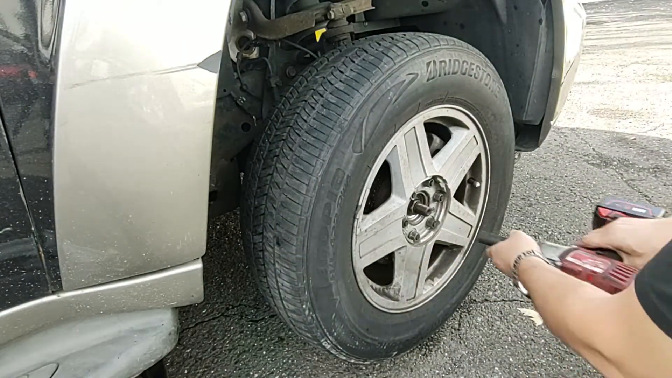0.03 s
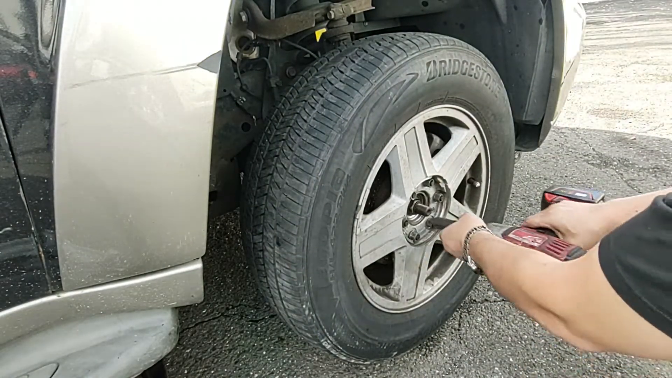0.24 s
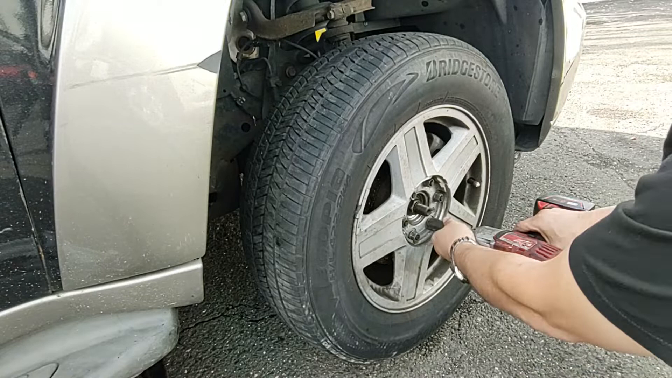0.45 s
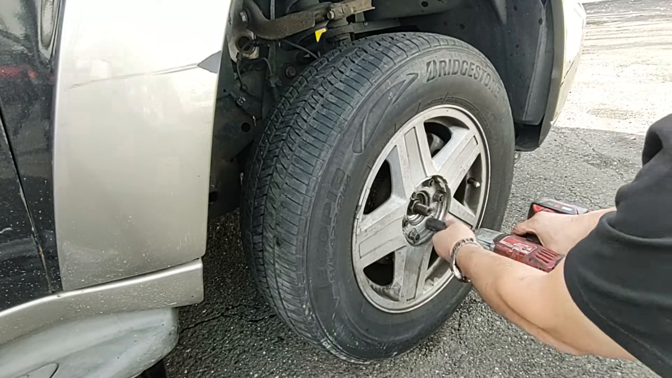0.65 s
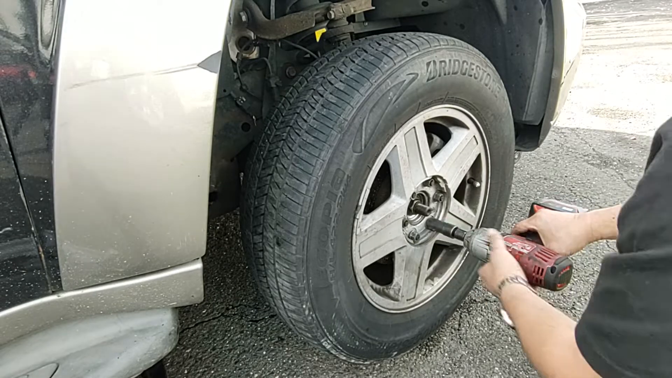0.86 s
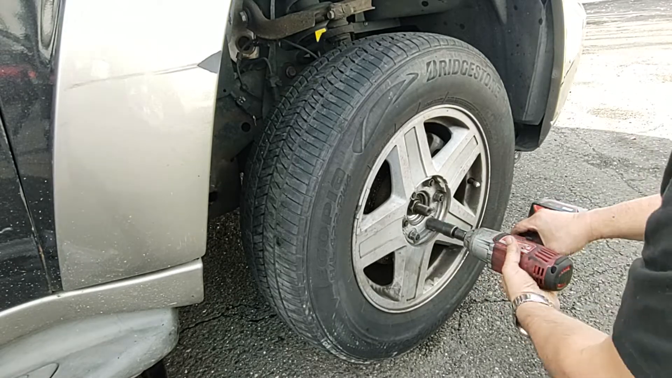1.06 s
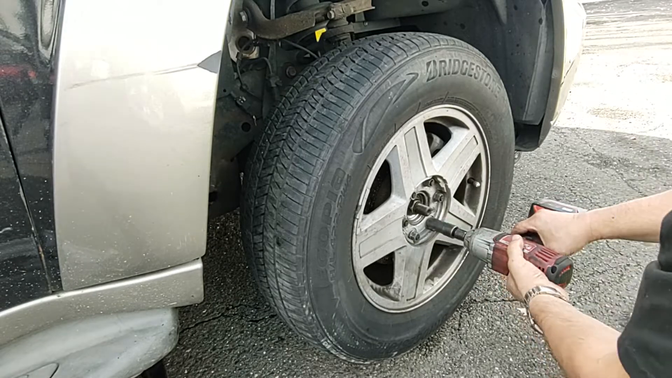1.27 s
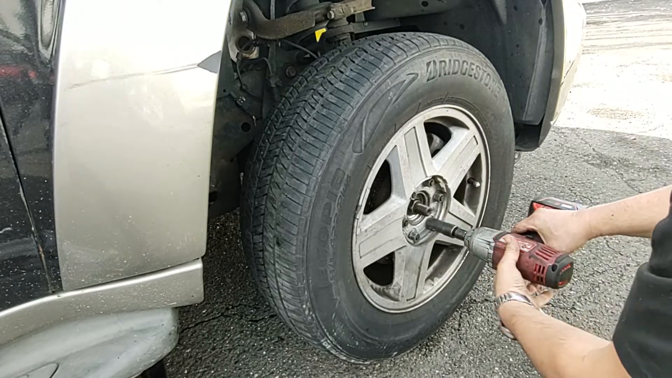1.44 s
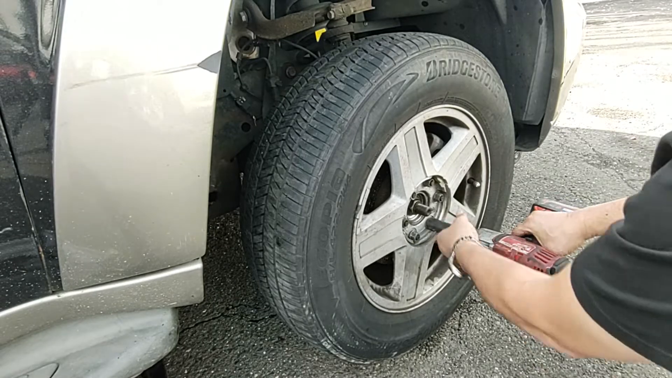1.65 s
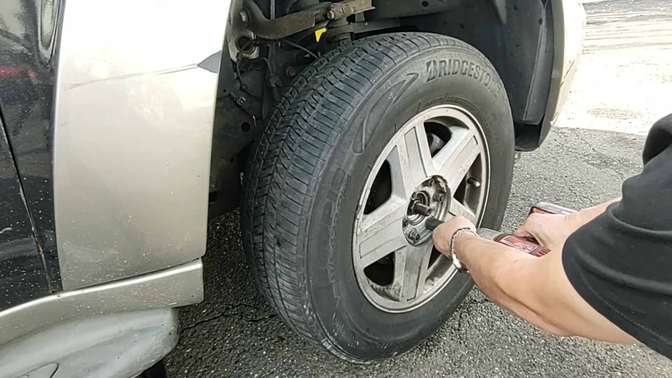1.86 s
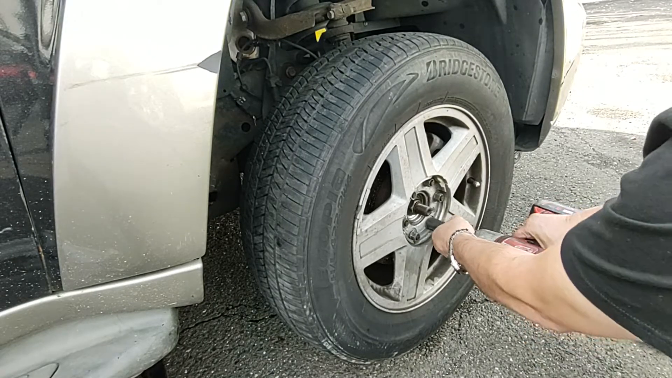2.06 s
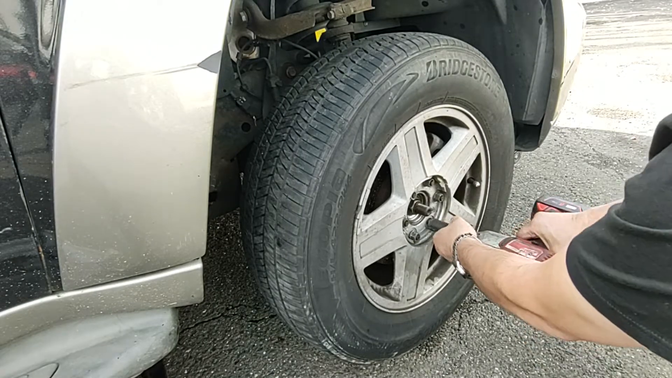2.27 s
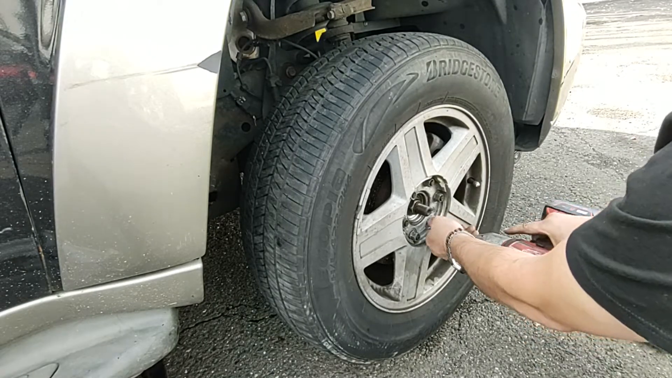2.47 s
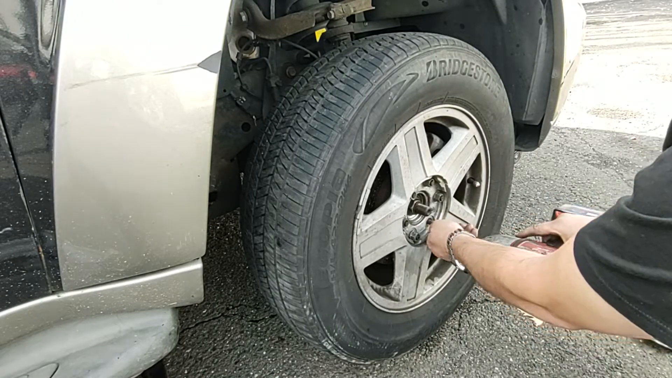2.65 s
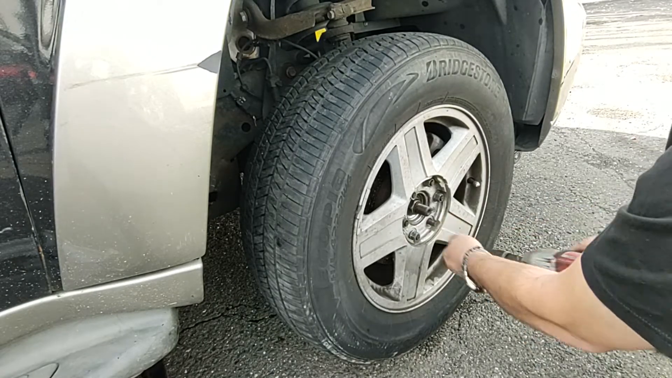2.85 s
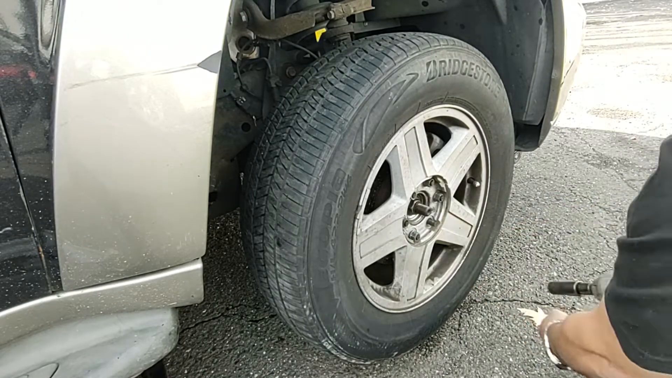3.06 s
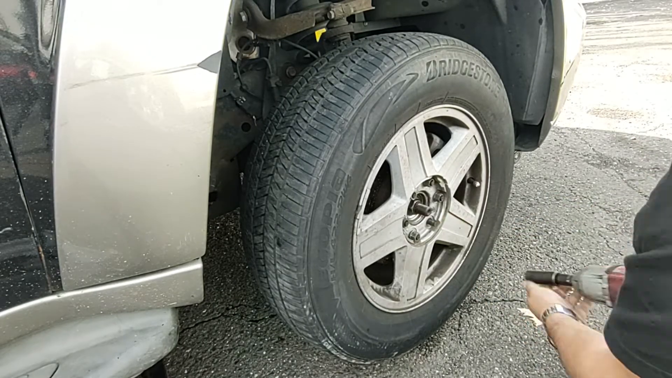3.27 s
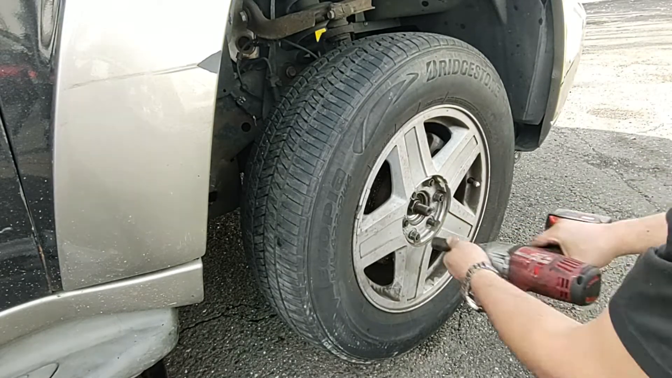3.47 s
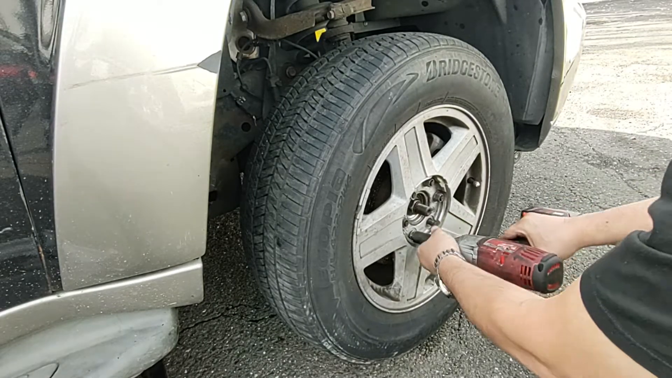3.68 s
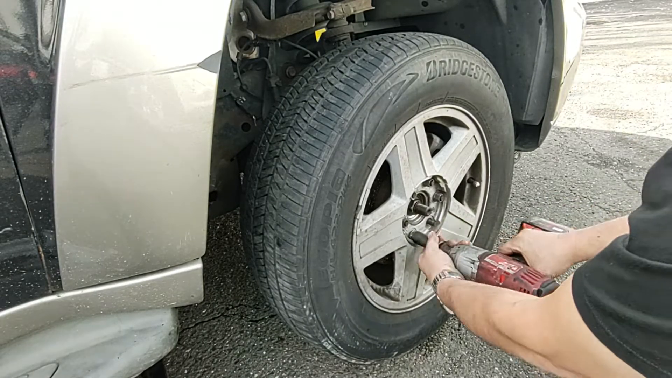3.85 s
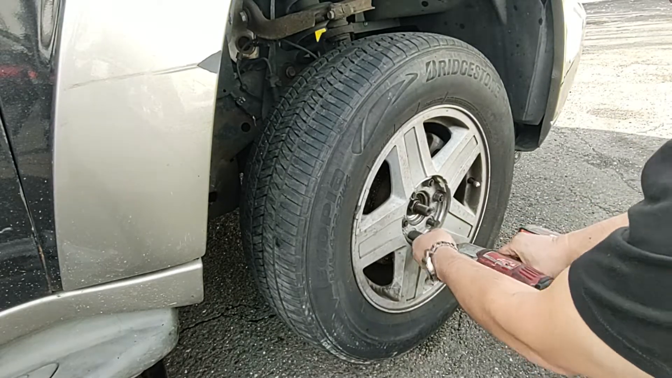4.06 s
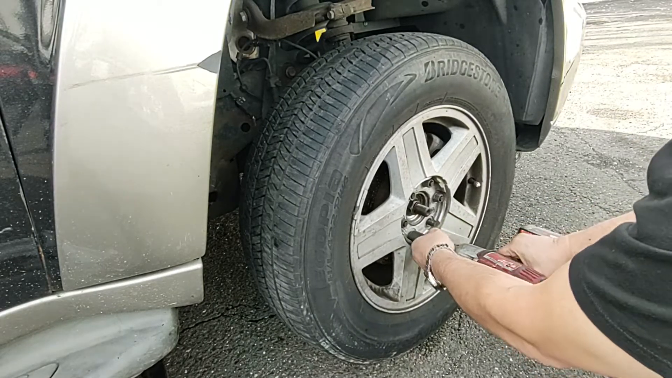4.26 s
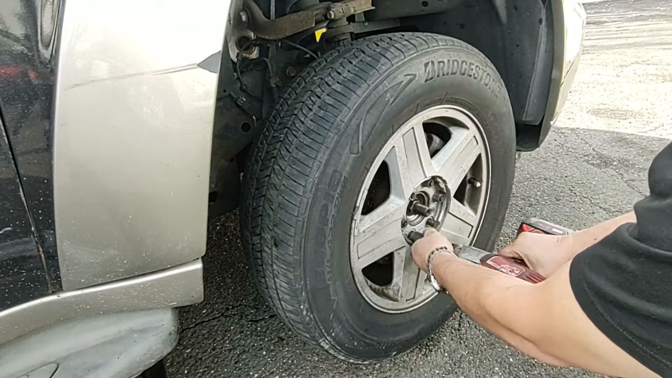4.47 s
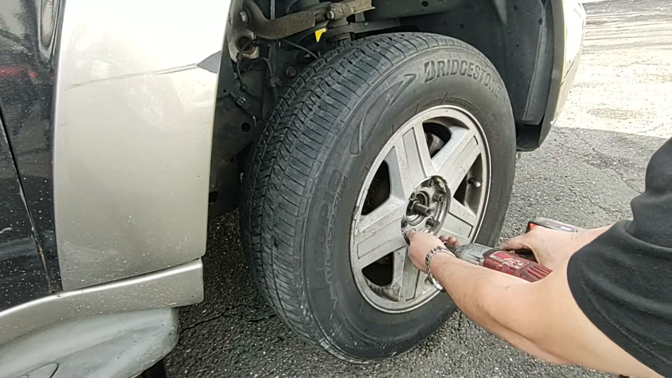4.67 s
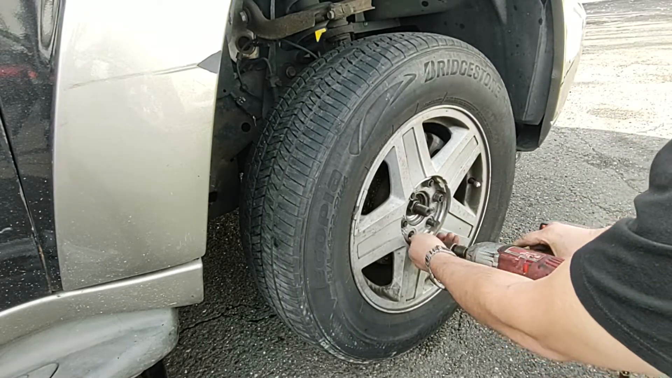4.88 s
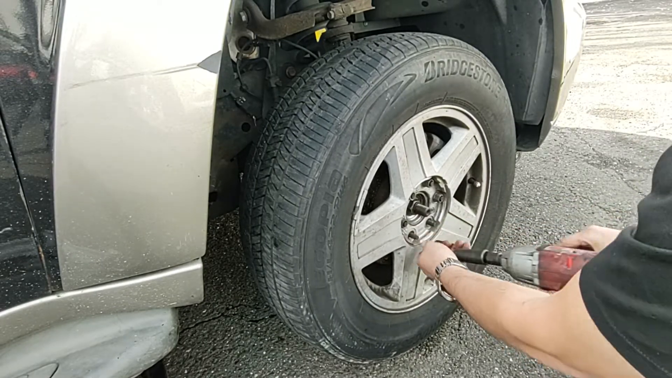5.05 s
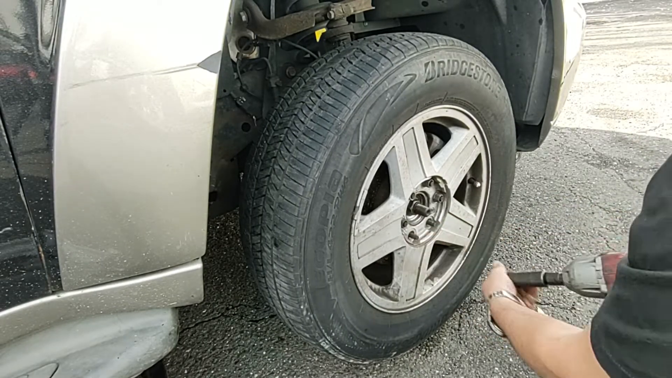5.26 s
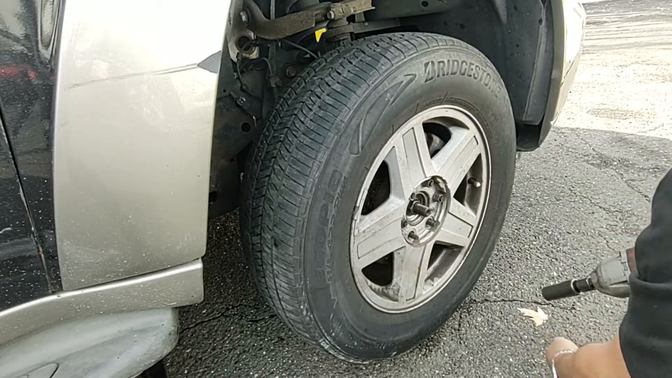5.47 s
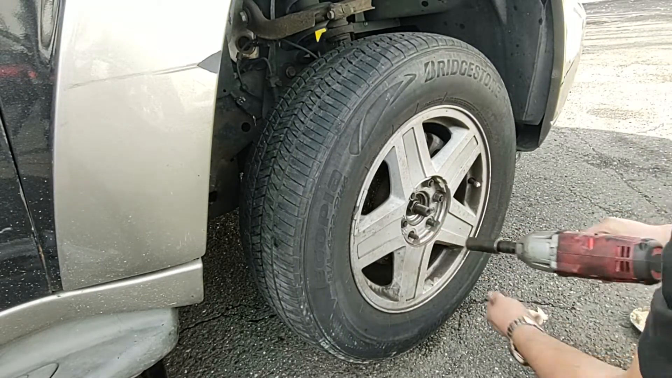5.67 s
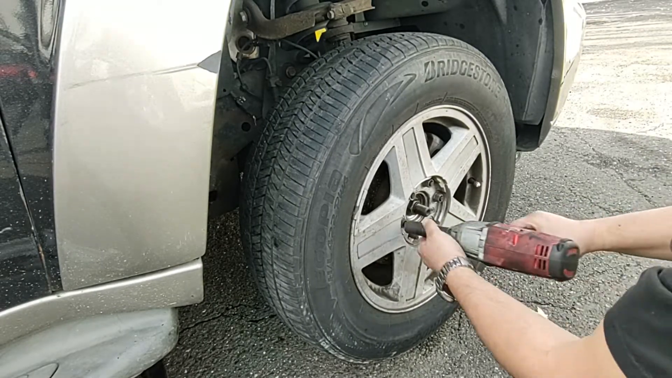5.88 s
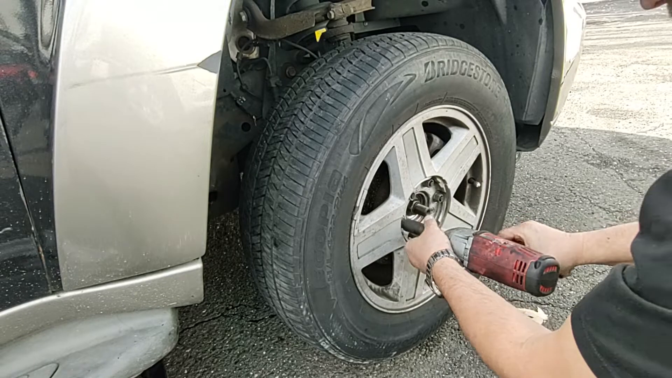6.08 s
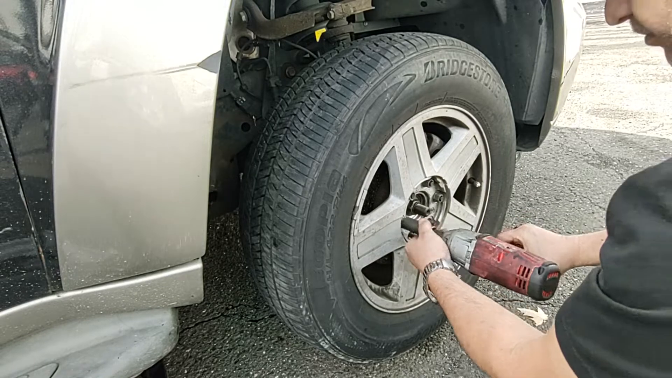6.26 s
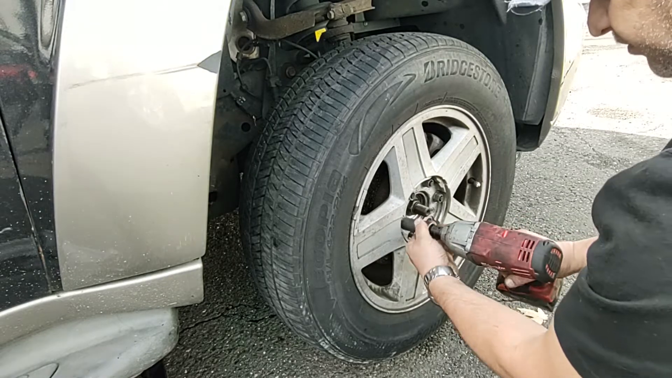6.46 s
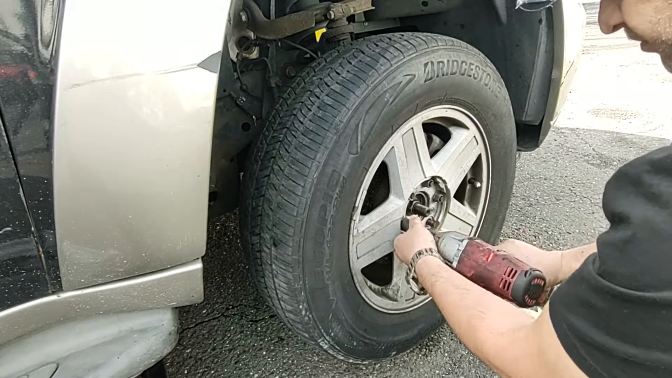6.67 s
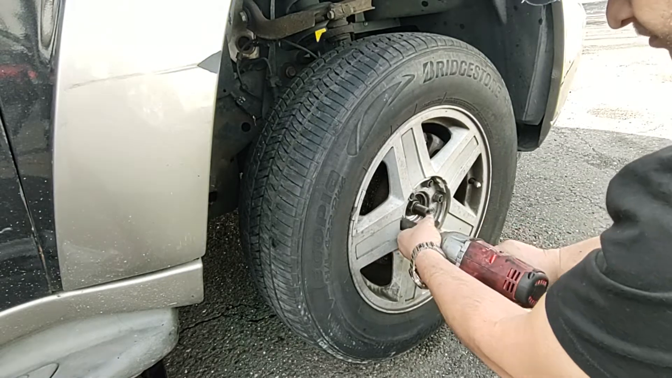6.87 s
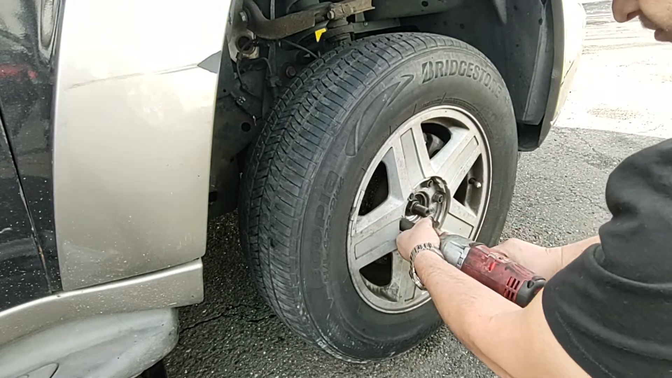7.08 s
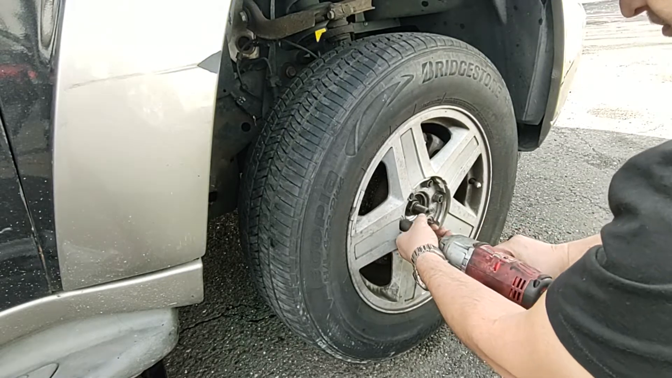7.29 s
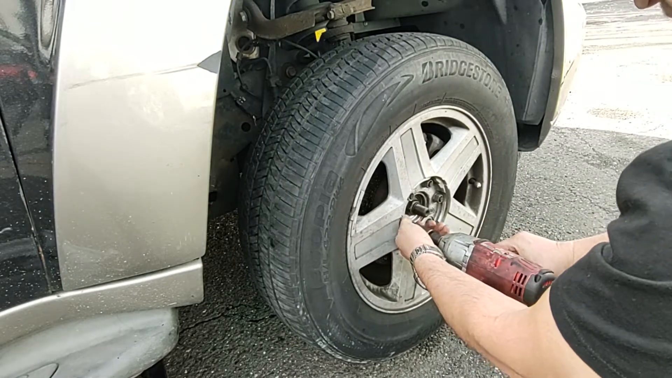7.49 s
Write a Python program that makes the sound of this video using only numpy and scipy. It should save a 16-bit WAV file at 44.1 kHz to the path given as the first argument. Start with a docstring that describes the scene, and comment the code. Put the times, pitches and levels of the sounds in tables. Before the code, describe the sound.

Slightly right of a near stereo microphone, a power wrench winds down while its socket clicks on a wheel. It hammers hard three times, about two seconds or more apart, each burst freeing a nut and rising to a gritty gear whine. Clicks, pings and dull rim knocks fill the gaps, over faint traffic, wind and sleeve rustle.

```python
"""The end of a whirring coast, clicks of steel, then three bursts of hammering that each end in a whine. A
cordless impact wrench works on a car wheel outdoors, near a two-port microphone. Its hammer blows are noisy
cracks that ring the wheel; its gears are noise plus sine tones that follow the speed. Between bursts the socket
clicks and knocks on nuts and rim, and the hammer knocks loosely while the tool whirrs: short noise plus ringing
modes. As the tool slows, a thin brake whine holds high up. Coloured noise makes the low traffic and wind
rumble, the far hush and the rustle of hands and sleeves."""
import sys
import numpy as np
from scipy import signal
from scipy.fft import rfft, irfft, next_fast_len
from scipy.io import wavfile
from scipy.ndimage import uniform_filter1d, map_coordinates

SR = 44100
rng = np.random.default_rng(int(sys.argv[2]) if len(sys.argv) > 2 else 0)


def invert_db(level):
    """Linear amplitude ratio for a level in decibels (20 dB per decade), elementwise."""
    return 10 ** (np.asarray(level, dtype=float) / 20)


def persist_wave(psi):
    """Save psi, clipped to +-1, as 16-bit WAV."""
    counts = np.round(np.clip(psi, -1, 1) * 32767).astype(np.int16)
    wavfile.write(sys.argv[1], SR, np.atleast_2d(counts).T)


N = 331936  # length in samples

# How loud the low rumble is over time. Each row: time in seconds, level in dB.
RUMBLE_LEVEL = [(0, -36), (0.15, -45), (0.6, -33.5), (0.9, -35.5), (1.2, -34), (1.7, -40.5), (2.2, -39),
                (3.4, -46), (3.75, -35), (3.95, -41.5), (4.4, -42), (5.0, -38), (5.08, -29), (5.16, -39),
                (6.0, -43), (6.4, -45), (6.75, -35), (7.526, -37)]
# Colour of the low rumble. Each row: frequency in Hz, level in dB.
RUMBLE_COLOUR = [(12, -56), (20, -30), (56, -7.5), (81, 1), (138, -2.5), (167, -6), (260, -38.5),
                 (340, -64.5), (570, -120)]
# Colour of the far street hush. Each row: frequency in Hz, level in dB.
HUSH_COLOUR = [(120, -19.5), (200, -0.5), (419, -11.5), (774, -10), (867, -11.5), (1230, -17), (1410, -18),
               (2300, -21), (4000, -47.5), (5200, -58), (8800, -120)]
# Colour of rustling hands and sleeves. Each row: frequency in Hz, level in dB.
CLOTH_COLOUR = [(1470, -47), (2500, -1), (4620, -9), (7830, -6), (9150, -12.5), (16000, -17)]
# Single brushes of hand or sleeve. Each row: middle in seconds, level in dB, length in seconds.
BRUSHES = [(0.12, -63, .17), (0.68, -66, .1), (0.89, -61, .03), (1.0, -61, .05), (1.6, -57, .025),
           (1.69, -56, .03), (1.79, -55, .03), (3.52, -60, .08), (3.6, -63, .02), (3.85, -68, .1),
           (3.98, -58, .03), (5.76, -55, .05), (6.34, -64, .06), (6.55, -67, .1), (6.78, -54, .05)]
RUSTLE_DB = -70  # hands and sleeves never quite rest
# How alike left and right are for the street. Each row: frequency in Hz, likeness from 0 to 1.
FAR_ALIKE = [(40, .2), (100, .3), (180, .7), (350, .8), (1000, .6), (4000, .2)]
# How alike left and right are for the tool. Each row: frequency in Hz, likeness from 0 to 1.
NEAR_ALIKE = [(200, 1), (1000, 0.76), (2500, 0.26), (5000, 0.02), (12000, 0.1)]

# Pulls of the trigger; the first is heard only as the end of a coast. Each row: trigger pulled in seconds,
# nut comes free in seconds, swell to full whirr in seconds, trigger let go in seconds, full whirr in dB.
PULLS = [(-2, -1.6, .05, -0.92, -15), (1.835, 2.2, .06, 2.42, -14.5), (4.02, 4.46, .05, 4.732, -14.5),
         (6.815, 7.1, .14, 7.6, -15)]
# Whirr against speed. Each row: gear mesh rate in Hz, level in dB.
WHIRR_BY_SPEED = [(110, -30), (200, -25), (420, -16.5), (700, -12.5), (950, -8), (1250, -11.5), (1800, -6),
                  (2300, -2.5), (3030, 0)]
LOADED_HZ, FREE_HZ, SPIN_UP_S = 2700, 3030, .09  # gear mesh under load and running free, time constant between
DRAG_PER_S, FRICTION_HZ = 1.01, 1550  # coasting, the mesh loses DRAG_PER_S * (mesh + FRICTION_HZ) each second
LOADED_DB, STOP_HZ = -10.5, 110  # whirr while hammering (dB against full), mesh at which the anvil sticks
WHINE_ENDS_HZ = 430  # slower than this the teeth no longer sing
# Colour of the whirr through the housing. Each row: frequency in Hz, level in dB.
WHIRR_COLOUR = [(1470, -50), (2500, -18), (2970, -4), (3360, -6.5), (4880, 1.5), (5440, 3), (8870, 1.5),
                (15200, -14), (16000, -39.5)]
# Duller rubbing of the nut on its thread. Each row: frequency in Hz, level in dB.
GRIND_COLOUR = [(200, -20.5), (300, -9), (900, -5), (2500, -1.5), (4000, -4.5), (15000, -7)]
# Tones of the whine. Each row: multiple of the mesh rate, level in dB.
WHINE_ORDERS = [(1, 5), (1.5, -10), (2, 2), (3, -1), (4, -2), (5, -1), (6, -4), (7, -6), (8, -9)]
# How the whine gets out through the casing. Each row: frequency in Hz, gain in dB.
CASING_GAIN = [(400, -27), (600, -19), (1100, -18), (1700, -24), (2400, -25), (3000, -17), (4000, -6),
               (6000, -4), (9000, -10), (11000, -22), (15000, -35)]

# Socket touching nut or rim, and a few loose knocks of the hammer while the tool whirrs. Each row: time in #
# seconds, level in dB, wheel ring in dB against that level,
CLICKS = [(0.3624, -32.5, -12, 6), (0.3666, -27, -9.5, -16), (0.4234, -30.5, -19.5, -22),
          (0.4274, -28.5, -10, -40), (0.5354, -38, -24, -33), (0.5387, -28.5, -15, -17),
          (0.5881, -38.5, 4, -21), (0.6494, -43, 12, -21), (1.1638, -53.5, 14, -24), (1.502, -55, 1, -22),
          (2.2434, -22, -20, -6.5), (2.2784, -21, -29, -31), (3.056, -29, -30, 8), (3.0939, -28, -29, 11),
          (3.2919, -26, -21, 4), (3.3214, -27, -14, -6), (3.3762, -36.5, -16, 5), (3.4705, -47, 2, -19),
          (3.5074, -45, -18, -26), (3.71, -25.5, -8.5, -13), (3.7234, -22, -35, 0.5),
          (3.7304, -32, -30, -12), (3.7504, -30.5, -8.5, -5), (3.8811, -50, 7, -16), (4.5286, -23, -7, 0.5),
          (5.5433, -27.5, -24, 4), (5.6875, -40, -12, 6), (5.7129, -22, -16, -28), (5.8192, -41.5, 4, -44),
          (5.8721, -49.5, -6, -31), (6.0292, -22.5, 0.7, -8), (6.0506, -27, 2.5, 0.5),
          (6.109, -50.5, 9, 14), (6.1604, -25.5, -12, -30), (6.182, -33, 0.5, -20), (6.243, -49, 10, -20),
          (6.365, -49, 10, -20), (6.3794, -37, 3, -13.5), (6.4752, -34, -18, -21), (6.5884, -32, -9.5, -8),
          (6.5979, -17.5, -7, -12), (6.7121, -43, 3, -17), (6.7371, -13, -5, -25), (7.221, -21, -20, -13),
          (7.2604, -20, -35, -19)]
# Colour of the click itself. Each row: frequency in Hz, level in dB.
CLICK_COLOUR = [(180, -34), (300, -9), (565, -13.5), (1300, -4), (2650, -1.5), (4590, -8), (8090, -7.5),
                (16000, -26)]
# Ringing modes of the wheel. Each row: frequency in Hz, level in dB when twisted at a stud,
# level in dB when knocked, time to fall 60 dB in seconds.
WHEEL_MODES = [(405, -3, -5, 0.032), (473, -9.5, -7, 0.042), (561.3, 1.5, -14, 0.19), (676, -6, -3.5, 0.1),
               (996, -7, -3, .09), (1109, -10, -3, .07), (1440, -14.5, -7.5, 0.043), (1536, -7, -13, .07)]
# Ringing modes of the socket. Each row: frequency in Hz, level in dB, time to fall 60 dB in seconds.
SOCKET_MODES = [(6260, -4, .05), (6360, 0, .07), (6480, -5, .05), (7600, -9, .035), (14930, -24, .12)]
# A thin high whine holds on while the tool slows. Each row: start in seconds, starting level in dB, length in
# seconds.
SONGS = [(3.06, -32, .13), (3.29, -36, .14), (5.545, -33, .13)]
SING_RISE_S, SING_SAG_DB = .012, 14  # fade at each end, and how far the song sinks over its length

# Hammer on anvil at its steady beat. Each row: first blow in seconds, last blow in seconds, level in dB.
BEATS = [(1.9415, 2.1301, -10), (4.1654, 4.376, -9.5), (6.9162, 7.0803, -11)]
BEAT_S, BEAT_SCATTER_S, BEAT_SCATTER_DB = .0235, .0004, 1  # approximate spacing, random spread in time and level
# Uneven blows while the hammer gathers speed or the nut gives way. Each row: time in seconds, level in dB.
UNEVEN_BLOWS = [(1.8302, -17), (1.8612, -10.5), (1.8674, -12), (1.8804, -10.5), (1.8914, -9), (1.9155, -7),
                (2.1564, -17), (2.165, -18), (4.0078, -20), (4.0367, -10.5), (4.047, -13), (4.0684, -14.5),
                (4.0786, -7), (4.0906, -13), (4.1075, -17), (4.1155, -10), (4.14, -9.5), (4.4014, -17),
                (4.4288, -20), (6.8094, -11.5), (6.8314, -10.5), (6.8508, -12), (6.8634, -8.5),
                (6.8897, -13.5), (7.1057, -12), (7.1327, -13), (7.1564, -21)]
# Colour of a blow. Each row: frequency in Hz, level in dB.
BLOW_COLOUR = [(88, -53.5), (150, -14.5), (361, -11.5), (555, -10), (759, -11), (1480, -3.5), (7770, -1),
               (15100, -16), (16000, -62.5)]
# Wheel ring at each stud. Each row: time in seconds, level in dB against the blow.
STUD_RING = [(2, -21.5), (4.2, -23.5), (7, -27.5)]

# Echo of the wheel arch and ground. Each row: frequency in Hz, time to fall 60 dB in seconds.
ECHO_DECAY = [(300, 0.18), (2000, 0.18), (10000, 0.04)]
LAG_S = 0.00015  # the tool is nearer the right port
TOP_HZ = 16000  # hardly anything passes above this


def unit(x):
    """Scaled to rms 1."""
    return x / np.sqrt(np.mean(x ** 2) + 1e-20)


def along(points, hz):
    """Reads a curve of (Hz, value) points on a log frequency axis."""
    point_hz, value = np.transpose(points)
    return np.interp(np.log(hz + 1), np.log(point_hz + 1), value)


def played(curve):
    """Gain per sample from (s, dB) points."""
    return invert_db(np.interp(np.arange(N) / SR, *np.transpose(curve)))


def wobble(rate):
    """A smooth random curve with rate random points a second."""
    knots = rng.standard_normal(int(N * rate / SR) + 4)
    return map_coordinates(knots, [np.arange(N) * rate / SR])


def filtered(x, response):
    """Filters x by a complex response of frequency."""
    size = next_fast_len(x.shape[-1] + 8192)
    spectrum = rfft(x, size) * response(np.fft.rfftfreq(size, 1 / SR))
    return irfft(spectrum, size)[..., :x.shape[-1]]


def spread(pair, spectrum, alike):
    """Colours two unrelated signals and mixes them into a partly alike left and right; rms 1."""
    def response(hz):
        turn = np.arccos(np.clip(along(alike, hz), 0, 1)) / 2
        return invert_db(along(spectrum, hz)) * [np.cos(turn), np.sin(turn)]
    mid, side = filtered(pair, response)
    return unit(np.array([mid + side, mid - side]))


def noise(spectrum, alike):
    """Coloured stereo noise of rms 1."""
    return spread(rng.standard_normal((2, N)), spectrum, alike)


def strikes(events, attack, t60, snap_db, rattle_db):
    """Envelope of all contacts (s, dB): a quick rise, a sharp snap and a dying, uneven rattle."""
    power, t = np.zeros(N + SR), np.arange(SR // 4) / SR
    snap_s = .009  # time for the snap to fall 60 dB
    fall = invert_db(-60 * t / t60) + invert_db(snap_db - 60 * t / snap_s)
    shape = fall * (1 - np.exp(-t / attack))
    for s, db in events:
        power[round(s * SR):][:len(t)] += (invert_db(db) * shape) ** 2
    return np.sqrt(power[:N]) * invert_db(rattle_db * wobble(900))


def ringing(events, modes, scatter_db, attack):
    """Each contact (s, dB, softness in dB per kHz) starts the modes anew; phase differs a little between ports."""
    out, t = np.zeros((2, N + SR)), np.arange(SR // 3) / SR
    hz, level, t60 = np.transpose(modes)[..., None]
    envelope = invert_db(level - 60 * t / t60) * (1 - np.exp(-t / attack))
    decay = envelope * np.exp(2j * np.pi * hz * t)
    luck = rng.standard_normal((len(events), 3, len(modes)))
    for (s, db, soft), (size, phase, apart) in zip(events, luck):
        port_turn = np.outer([1, -1], apart * np.minimum(hz[:, 0] / 3000, 1))
        turn = 3 * phase + port_turn
        gain = invert_db(db + scatter_db * size - soft * hz[:, 0] / 1000)
        out[:, round(s * SR):][:, :len(t)] += (gain * np.exp(1j * turn) @ decay).real
    return out[:, :N]


def street():
    """Lumpy low rumble, a far hush that barely wavers and the faint rustle of hands, all coloured noise."""
    lumps = invert_db(3.2 * np.array([wobble(7.3), wobble(7.1)]))
    rumble = played(RUMBLE_LEVEL) * unit(lumps * noise(RUMBLE_COLOUR, FAR_ALIKE))
    hush = invert_db(-48 + wobble(3.1)) * noise(HUSH_COLOUR, FAR_ALIKE)
    t = np.arange(N) / SR
    hands = invert_db(RUSTLE_DB + 1.5 * wobble(5))
    for s, db, length in BRUSHES:
        hands = hands + invert_db(db) * np.exp(-((t - s) / length) ** 2)
    rustle = hands * invert_db(2.6 * wobble(35)) * noise(CLOTH_COLOUR, FAR_ALIKE)
    return rumble + hush + rustle


def motor():
    """Gear mesh rate while the freed tool spins up and coasts down on drag, and the strength of its whirr."""
    t, mesh_hz, drive = np.arange(N) / SR, np.zeros(N), np.zeros(N)
    for on, free, swell, off, top_db in PULLS:
        since_free = np.clip(t - free, 0, None)
        running = FREE_HZ - (FREE_HZ - LOADED_HZ) * np.exp(-since_free / SPIN_UP_S)
        slowing = np.exp(-DRAG_PER_S * np.clip(t - off, 0, None))
        speed = (running + FRICTION_HZ) * slowing - FRICTION_HZ
        load_db = LOADED_DB * np.exp(-(since_free / swell) ** 2)
        turning = np.clip((t - on) / .04, 0, 1) * np.clip((speed - STOP_HZ) / 60, 0, 1)
        drive += turning * invert_db(top_db + load_db + along(WHIRR_BY_SPEED, np.maximum(speed, 1)))
        mesh_hz += np.where((t > free) & (speed > WHINE_ENDS_HZ), speed, 0)
    return mesh_hz, drive


def gears():
    """Gear teeth whine at the mesh rate and its multiples over a gritty whirr and a duller grind."""
    mesh_hz, drive = motor()
    teeth = 2 * np.pi * np.cumsum(mesh_hz) / SR
    grit = invert_db(1.64 * wobble(700) + 1.7 * wobble(60))  # uneven tooth contact
    whirr = spread(grit * rng.standard_normal((2, N)), WHIRR_COLOUR, NEAR_ALIKE)
    lingering = np.clip(.15 / (drive + 1e-9), 1, 3) ** 0.13  # the grind fades more slowly than the whirr
    grind = invert_db(-7) * noise(GRIND_COLOUR, NEAR_ALIKE) * lingering
    # teeth knock harder as the load comes off: the whine stands out more at lower speed
    slack = uniform_filter1d(1. * (mesh_hz > 0), size=1300)
    slack = slack * np.clip(2000 / (mesh_hz + 300), 1, 6) ** .3
    slack = slack * (1.15 - .55 * (mesh_hz / FREE_HZ) ** 12)
    # play between the teeth blurs each line, most at speed
    play = (mesh_hz / 3000) ** 8 * .75 * wobble(260) + .13 * wobble(50)
    # the motor end is more nearly in front of the microphone than the socket
    facing = .4 * np.pi * LAG_S
    whine = np.zeros((2, N))
    for k, db in WHINE_ORDERS:
        tone_hz = k * mesh_hz
        phase = k * (teeth + play) + np.outer([1, -1], facing * tone_hz + 0.22 * wobble(15))
        flutter_db = 1.8 * wobble(70) + 1.5 * wobble(14)
        gain = invert_db(db + along(CASING_GAIN, tone_hz) + flutter_db)
        whine += gain * (tone_hz < SR / 3) * np.sin(phase)
    return drive * (whirr + grind + slack * whine)


def socket_and_brake():
    """Light contacts tap, ring wheel and socket; while the tool slows, a thin brake whine holds at the top
    socket frequency."""
    taps = [(s, db) for s, db, _, _ in CLICKS]
    tap = strikes(taps, attack=0.00088, t60=0.068, snap_db=10, rattle_db=3.5) * noise(CLICK_COLOUR, NEAR_ALIKE)
    modes = [(hz, db, t60) for hz, _, db, t60 in WHEEL_MODES]
    # gentle touches reach mainly the low modes
    knocks = [(s, db + rel, .7 * max(-29 - db, 0)) for s, db, rel, _ in CLICKS]
    wheel = ringing(knocks, modes, scatter_db=3.5, attack=0.0002)
    pings = [(s, db + rel, 0) for s, db, _, rel in CLICKS]
    tube = ringing(pings, SOCKET_MODES, scatter_db=4, attack=.0005)
    # noise squeezed into a narrow band around the top mode
    top_hz = SOCKET_MODES[-1][0]
    song = unit(filtered(rng.standard_normal((2, N)), lambda hz: 1 / (1 + ((hz - top_hz) / 30) ** 2)))
    t, held = np.arange(N) / SR, np.zeros(N)
    for s, db, length in SONGS:
        fade = np.clip(np.minimum(t - s, s + length - t) / SING_RISE_S, 0, 1)
        held += fade * invert_db(db - SING_SAG_DB * np.clip((t - s) / length, 0, 1))
    return tap + wheel + tube + held * song


def hammer():
    """Each blow is a noisy crack of steel that also twists the wheel into ringing."""
    steady = []
    for first, last, db in BEATS:
        count = round((last - first) / BEAT_S) + 1
        steady += [(s, db) for s in np.linspace(first, last, count)]
    steady = steady + rng.standard_normal((len(steady), 2)) * [BEAT_SCATTER_S, BEAT_SCATTER_DB]
    blows = [*steady, *UNEVEN_BLOWS]
    envelope = strikes(blows, attack=.001, t60=.055, snap_db=4, rattle_db=1.5)
    crack = envelope * noise(BLOW_COLOUR, NEAR_ALIKE)
    modes = [(hz, db, t60) for hz, db, _, t60 in WHEEL_MODES]
    twists = [(s, db + np.interp(s, *np.transpose(STUD_RING)), 0) for s, db in blows]
    return crack + ringing(twists, modes, scatter_db=2.5, attack=.0012)


def arch(x):
    """The wheel arch and the ground answer with a noise tail; each frequency dies at its own speed."""
    hz, t, z = signal.stft(rng.standard_normal((2, SR // 3)), SR, nperseg=256)
    fading = z * invert_db(-60 * t / along(ECHO_DECAY, hz)[:, None])
    tail = signal.istft(fading, SR, nperseg=256)[1]
    return signal.fftconvolve(x, tail / np.linalg.norm(tail[0]), axes=1)[:, :N]


def placed(tool):
    """Later and softer at the left port, and thin in the bass."""
    def response(hz):
        delay = np.exp(-1j * np.pi * hz * LAG_S * np.array([[1], [-1]]))
        return delay / (1 + (110 / (hz + 1)) ** 4)
    return filtered(tool, response) * invert_db([[-.5], [.5]])


def scene():
    """The tool a little to the right, its echo 10 dB down, and the street under it."""
    background = street()
    tool = placed(gears() + socket_and_brake() + hammer())
    return tool + invert_db(-10) * arch(tool) + background


def band_limit(x):
    """A steep low-pass at the top of the band."""
    return signal.sosfilt(signal.butter(12, 16670, fs=SR, output="sos"), x)


def record(dry):
    """Peaks are bent softly to stay within full scale, then the very top is filtered off."""
    clipped = dry / (1 + np.abs(dry) ** 8) ** (1 / 8)
    mix = filtered(clipped, lambda hz: 1 / (1 + (hz / TOP_HZ) ** 90))
    return band_limit(mix)


dry = scene()
out = record(dry)
persist_wave(out)
```